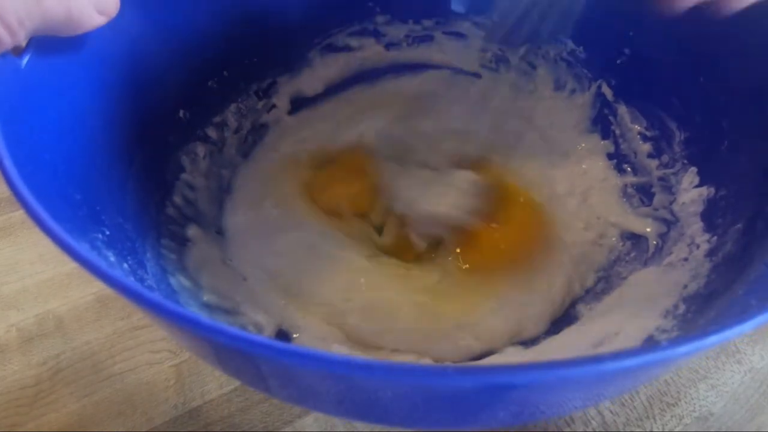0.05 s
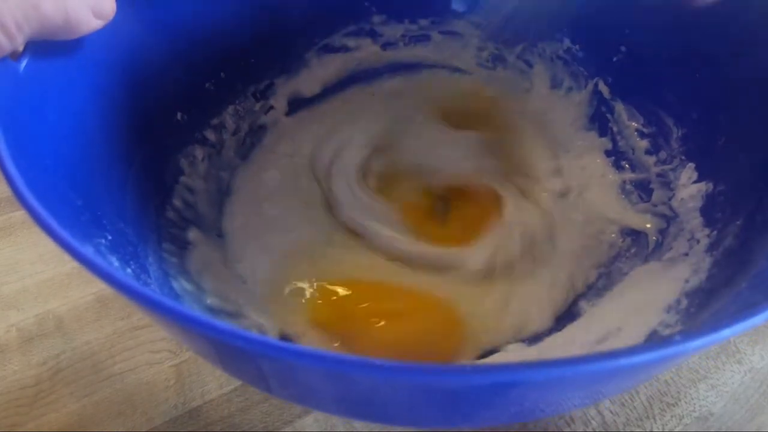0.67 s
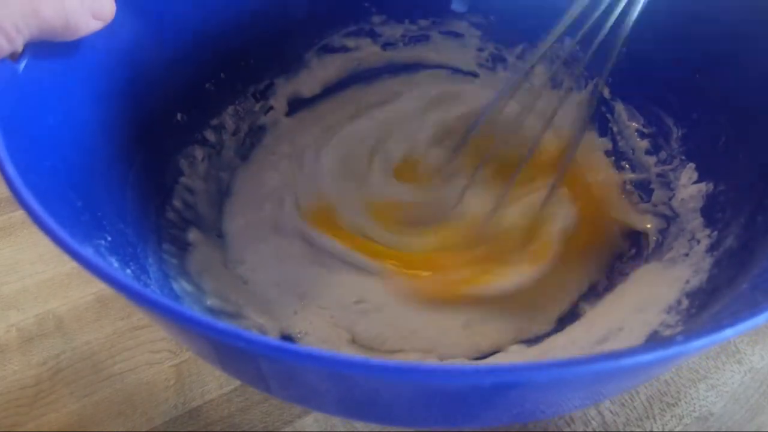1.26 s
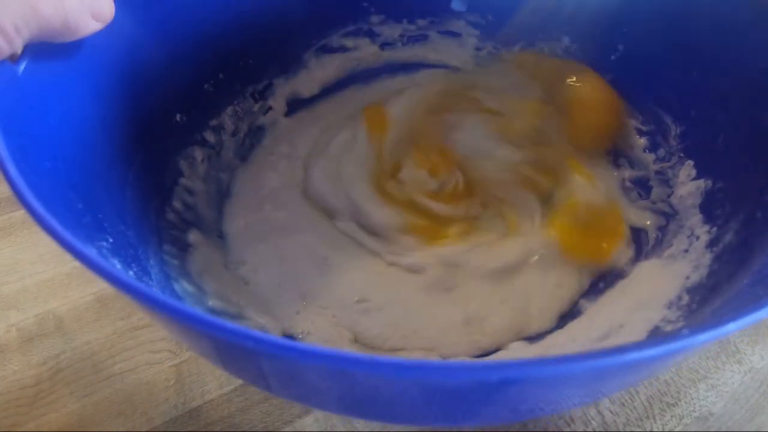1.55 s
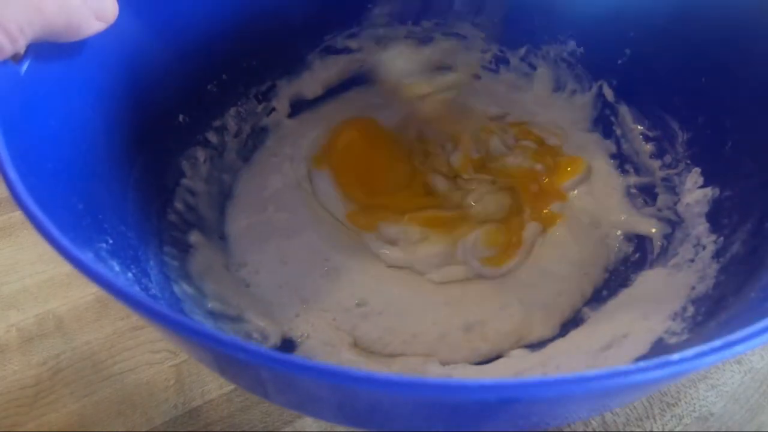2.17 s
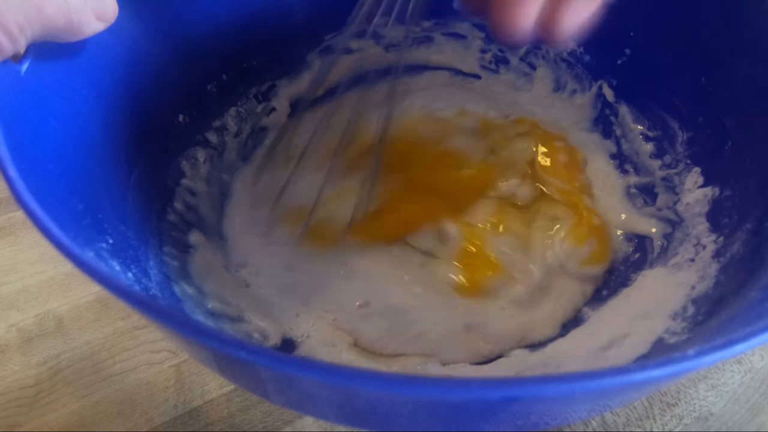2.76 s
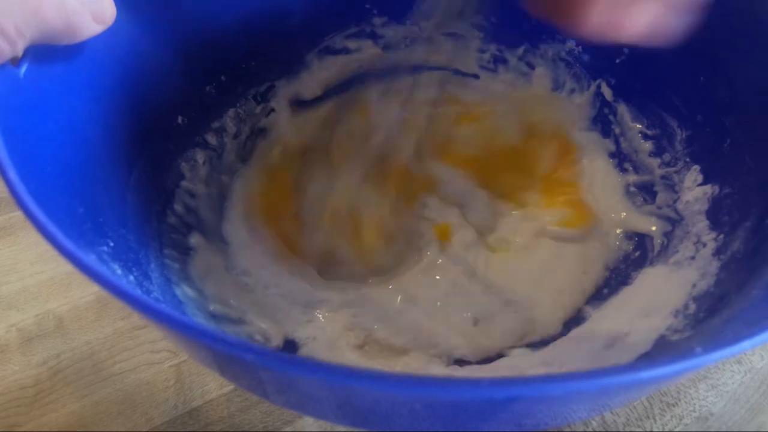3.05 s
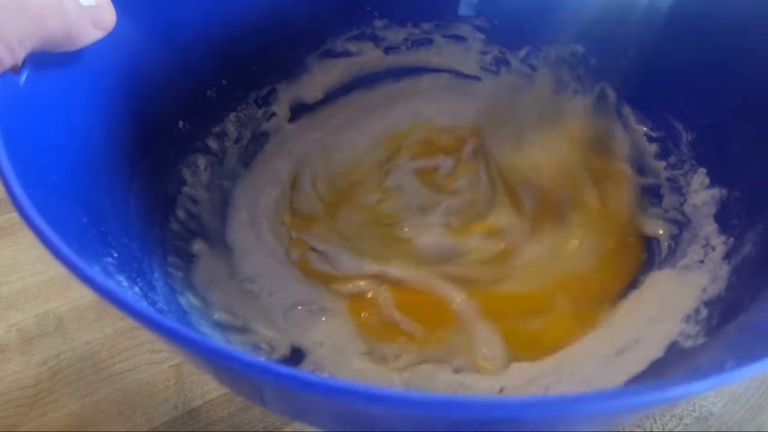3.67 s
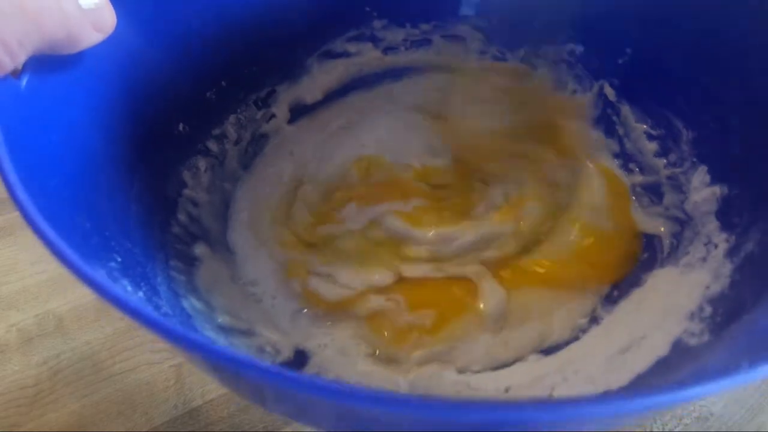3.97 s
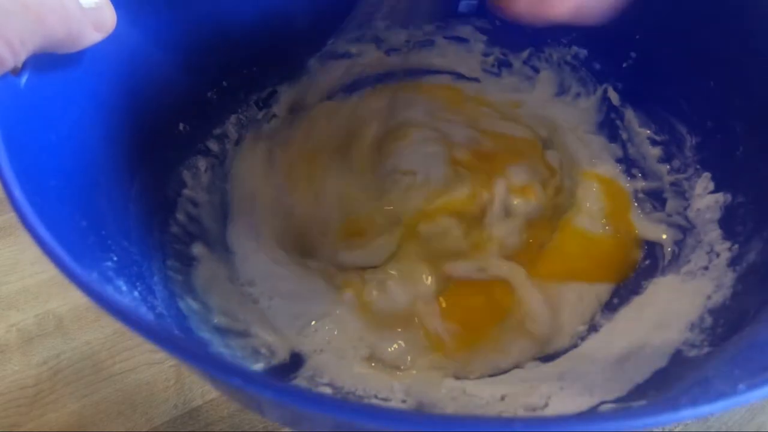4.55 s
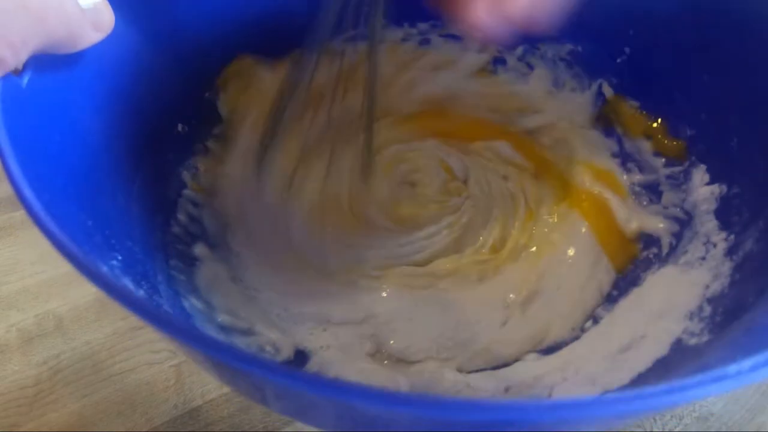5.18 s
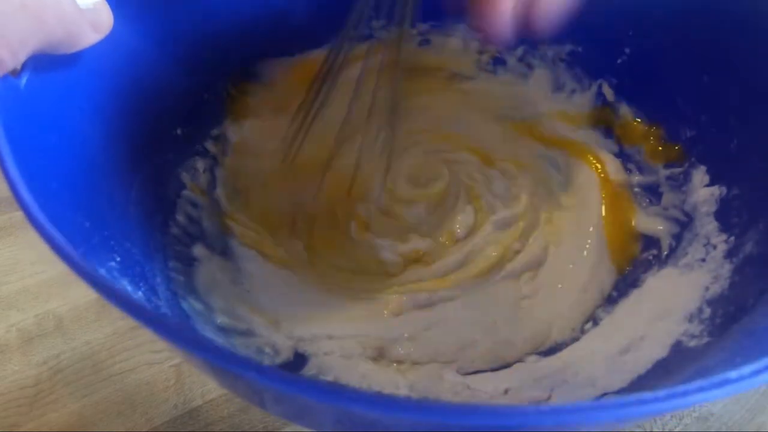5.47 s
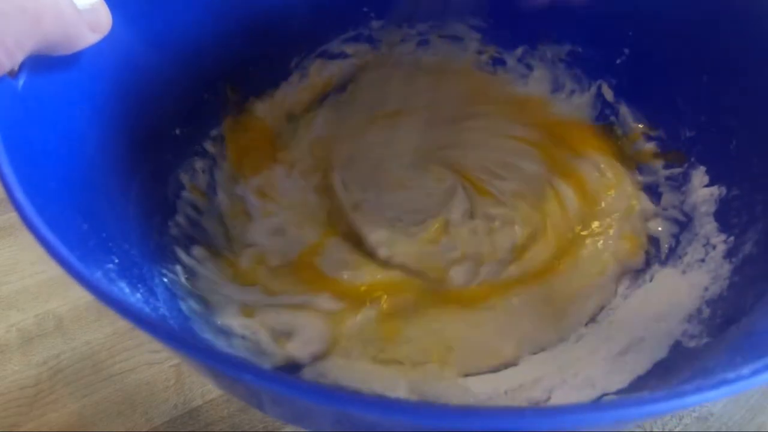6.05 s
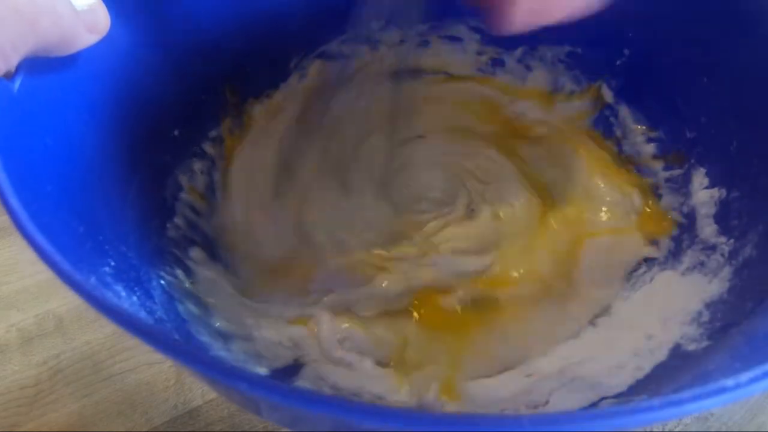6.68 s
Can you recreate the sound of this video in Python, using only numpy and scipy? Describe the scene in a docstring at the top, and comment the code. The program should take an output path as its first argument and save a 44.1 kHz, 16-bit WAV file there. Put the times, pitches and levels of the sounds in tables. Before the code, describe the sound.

A wire whisk beats eggs into batter in a plastic bowl, heard up close in a small, slightly reverberant kitchen. From the start, quick, uneven hollow knocks and thin wire ticks mix with rasping swipes along the bowl wall and fine wet crackles. Sharper clicks stand out around 0.4 and 0.7 seconds, and the bowl occasionally shifts on the counter with soft low thuds. At about 2 seconds the whisking rests, leaving only a faint low appliance hum that runs throughout. A short rub and a knock come around 2.5 seconds, and the beating resumes at 2.8 seconds, easing briefly just after 4 seconds. From about 4.9 seconds the strokes are fuller and wetter, with more squelches and tiny snaps of batter and a sharp clack near 6.3 seconds. The whisking continues until the end, just before 7 seconds.

```python
"""Quick knocks and wet swipes: a wire whisk beats eggs into batter in a plastic bowl on a kitchen
counter, with a short rest after two seconds. Impacts of the wires excite the bowl's normal modes, and
stick-slip friction on its wall drives a rasp and a drone. The batter crackles as its films rupture.
An appliance hums low in the small, reverberant room."""
import sys
import numpy as np
from scipy import signal
from scipy.fft import rfft, irfft, next_fast_len
from scipy.io import wavfile
from scipy.ndimage import uniform_filter1d

SR = 44100
rng = np.random.default_rng(int(sys.argv[2]) if len(sys.argv) > 2 else 0)


def wav_out(sig):
    """Save sig, one row per channel (or a flat mono array), as 16-bit PCM at SR to the path in sys.argv[1]."""
    wavfile.write(sys.argv[1], SR, np.round(np.clip(np.atleast_2d(sig).T, -1, 1) * 32767).astype(np.int16))


N = 300365
TIME = np.arange(N) / SR
CUTOFF_HZ = 16000


def from_db(db):
    """Amplitude ratio of a level in decibels."""
    return 10 ** (np.asarray(db) / 20)


def rms_one(x):
    """Normalisation to unit rms."""
    return x / np.sqrt(np.mean(x ** 2) + 1e-20)


def peak_one(x):
    """Normalisation to unit rms over the loudest 4 ms."""
    return x / np.sqrt(uniform_filter1d(x ** 2, size=176, mode="constant").max() + 1e-20)


def steady(x, size=2600):
    """Division by the running rms flattens the envelope and keeps the fine structure."""
    local_power = np.maximum(uniform_filter1d(x ** 2, size=size), 0)
    return x / np.sqrt(local_power + .02 * np.mean(x ** 2))


def drift(per_s):
    """Random modulation of unit rms, interpolated between Gaussian values."""
    return rms_one(np.interp(TIME * per_s, np.arange(4096), rng.standard_normal(4096)))


def lowpass(x, hz, order):
    """Butterworth low-pass filtering."""
    return signal.sosfilt(signal.butter(order, hz, fs=SR, output="sos"), x)


def colour(x, spectrum):
    """Minimum-phase filtering to rows of (f/Hz, level/dB), by way of the causal cepstrum."""
    size = next_fast_len(len(x) + 4096)
    size += size % 2
    hz, db = np.transpose(spectrum)
    bin_hz = np.arange(size // 2 + 1) * SR / size
    log_gain = np.log(from_db(np.interp(np.log(bin_hz + 1), np.log(hz), db)))
    cepstrum = irfft(log_gain)[:size // 2]
    response = np.exp(2 * rfft(cepstrum, size) - cepstrum[0])
    return irfft(rfft(x, size) * response)[:len(x)]


def resonate(x, hz, *widths_hz):
    """Damped resonators in series, one per bandwidth, each of unit gain at resonance."""
    for width in widths_hz:
        r = np.exp(-np.pi * width / SR)
        feedback = [1, -2 * r * np.cos(2 * np.pi * hz / SR), r * r]
        x = signal.lfilter(np.array([1, 0, -1]) * (1 - r * r) / 2, feedback, x + 1e-18)
    return x


def body(x, modes, scatter_db=0):
    """Modal superposition; the point of contact scatters the level of each mode."""
    return sum((-1) ** k * from_db(db + scatter_db * rng.standard_normal()) * resonate(x, hz, width)
               for k, (hz, width, db) in enumerate(modes))


def impulses(per_s, spread_db):
    """A Poisson process of clicks, mostly small, a few large."""
    sizes = from_db(spread_db * np.minimum(rng.exponential(1, N), 4)) * rng.choice([-1, 1], N)
    return sizes * (rng.random(N) < per_s / SR)


def grains(spectrum, per_s, q, spread_db, patchy_db, count=20):
    """Random impulses ring resonators of quality q; the favoured pitches shift as the batter moves."""
    hz, db = np.transpose(spectrum)
    clicks, band = impulses(per_s, spread_db), rng.integers(0, count, N)
    out = np.zeros(N)
    for k, pitch in enumerate(np.geomspace(hz[0], hz[-1], count)):
        ring = resonate(clicks * (band == k), pitch, pitch / q, 4 * pitch / q)
        out += from_db(np.interp(pitch, hz, db) + patchy_db * drift(25)) * ring
    return steady(out)


def swell(rows, attack_s, release_s):
    """Envelope of rows (t/s, duration/s, level/dB): exponential rise, hold and decay, added in power."""
    t = TIME[::40]
    power = np.zeros(len(t))
    for start, length, db in rows:
        nepers = np.maximum(start - t, 0) / attack_s + np.maximum(t - start - length, 0) / release_s
        power += from_db(2 * db) * np.exp(-2 * nepers)
    return np.interp(TIME, t, np.sqrt(power))


# spectrum of the room's air noise: f/Hz, relative level/dB
AIR_SPECTRUM = [(20, -1), (45, -2), (90, 2), (150, -6), (290, -2), (400, -14), (650, -25), (1000, -25),
                (1600, -33), (5000, -35), (16000, -44)]
# tones of the appliance: f/Hz, rms level/dB
HUM_TONES = [(57.66, -48.5), (64.86, -51.7), (79.28, -53.0), (115.0, -66)]
def appliance(air_db=-55):
    """Beating: close low tones throb against each other over a soft rush of air."""
    tones = sum(from_db(db) * np.sqrt(2) * np.sin(2 * np.pi * (hz * TIME + rng.random()))
                for hz, db in HUM_TONES)
    return tones + from_db(air_db) * rms_one(colour(rng.standard_normal(N), AIR_SPECTRUM))


# reverberation time by band: lower f/Hz, upper f/Hz, T60/s
ROOM_DECAY = [(40, 2800, 0.44), (2700, 10200, 0.31), (9000, 21000, 0.25)]
def kitchen(x, build_s=0.00039):
    """Reverberation: dense reflections from near walls decay exponentially, the treble soonest."""
    t = TIME[:SR // 2]
    tail = np.zeros(len(t))
    for low, high, t60 in ROOM_DECAY:
        band = signal.butter(2, [low, min(high, CUTOFF_HZ)], "band", fs=SR, output="sos")
        tail += signal.sosfilt(band, rng.standard_normal(len(t))) * from_db(-60 * t / t60)
    tail *= 1 - np.exp(-t / build_s)
    return signal.fftconvolve(x, tail / np.sqrt(np.sum(tail ** 2)))[:N]


# spells of whisking, with the wires always in the batter: t/s, duration/s, relative level/dB
SPELLS = [(0.104, 0.23, -8), (0.392, 0.93, 1.5), (1.256, 0.67, 2.5), (2.826, 0.59, -1.5),
          (3.382, 0.72, 2.5), (4.26, 0.21, -7), (4.442, 0.46, 2.5), (4.85, 1.95, 5.5)]
# swipes through the batter and along the wall, the first row a brief burst as the sound begins: t/s,
# duration/s, wall f/Hz, then relative level/dB of scrape, drone, crackle and squelch
SWIPES = [(0.0, 0.016, 536, -40.5, -75, -66.5, -83), (0.085, 0.11, 479, -42.5, -45.5, -71, -73),
          (0.195, 0.054, 462, -56, -68, -63, -64.5), (0.425, 0.0083, 495, -38, -60, -58, -70),
          (0.65, 0.023, 455, -43.5, -47, -57, -67), (0.88, 0.14, 481, -49.5, -69, -65.5, -93),
          (1.099, 0.024, 505, -41.5, -46.5, -58.5, -64), (1.304, 0.044, 449, -42.5, -45, -58, -59),
          (1.466, 0.067, 472, -40, -39.5, -66, -71), (1.553, 0.043, 460, -46, -57, -66, -64),
          (1.742, 0.12, 456, -44.5, -52, -68.5, -71), (1.9, 0.086, 498, -50.5, -54, -68.5, -79),
          (2.47, 0.05, 450, -58, -35.5, -90, -100), (2.555, 0.05, 437, -44, -40, -68, -92),
          (2.68, 0.05, 470, -53.5, -54.5, -72, -89), (2.817, 0.07, 461, -44.5, -46.5, -67, -67),
          (2.948, 0.023, 478, -64, -48.5, -67, -83), (3.066, 0.024, 487, -52, -62, -65, -87),
          (3.13, 0.096, 463, -45, -44.5, -65.5, -68), (3.432, 0.086, 477, -40.5, -44.5, -70.5, -64),
          (3.614, 0.058, 442, -41.5, -37.5, -73, -85), (3.713, 0.059, 464, -38.5, -53.5, -62, -57),
          (3.919, 0.091, 490, -41.5, -48, -61, -64), (4.05, 0.086, 482, -52, -45, -78, -91),
          (4.214, 0.052, 484, -54.5, -49.5, -71.5, -96), (4.3, 0.039, 483, -40.5, -43.5, -63, -86),
          (4.43, 0.11, 501, -44.5, -45, -66, -91), (4.601, 0.03, 471, -44, -38, -62.5, -64.5),
          (4.711, 0.021, 496, -38, -61, -65, -84), (4.788, 0.02, 472, -43, -35.5, -61, -82),
          (4.859, 0.063, 491, -45, -45.5, -67, -57.5), (4.966, 0.034, 462, -41, -43, -73, -66),
          (5.031, 0.041, 494, -39.5, -36.5, -66, -54), (5.163, 0.13, 482, -48, -47.5, -61, -62),
          (5.395, 0.051, 482, -41, -35.5, -70, -62), (5.523, 0.033, 502, -45, -38, -59, -62),
          (5.6, 0.015, 478, -31.5, -48, -82, -54.5), (5.661, 0.02, 482, -43.5, -33.5, -59, -57.5),
          (5.848, 0.063, 466, -66, -48, -76, -66.5), (5.955, 0.084, 477, -41.5, -50, -62, -59),
          (6.088, 0.079, 451, -52, -39.5, -64, -65.5), (6.297, 0.033, 478, -41.5, -59, -72, -57),
          (6.394, 0.042, 444, -59, -41.5, -62, -60), (6.547, 0.054, 478, -33.5, -44, -62, -55),
          (6.666, 0.063, 475, -43, -42.5, -56, -59.5)]
def effort(sound, stir_db, attack_s, release_s):
    """Incoherent addition: the envelope of one sound sums swipes and uneven stirring in power."""
    column = ["scrape", "drone", "crackle", "squelch"].index(sound)
    rows = [(start, length, levels[column]) for start, length, _, *levels in SWIPES]
    stirring = swell(SPELLS, attack_s=0.004, release_s=0.011) * from_db(stir_db + 2 * drift(7.6))
    return np.hypot(swell(rows, attack_s, release_s), stirring)


def wall_note(wander_hz=10):
    """Loading: the wall's natural frequency glides from swipe to swipe and wanders as batter shifts."""
    start, length, hz, *_ = np.transpose(SWIPES)
    return np.interp(TIME, start + length / 2, hz) + wander_hz * drift(9)


# pitch range of bursting films, then spectra of crackle and squelch: f/Hz, relative level/dB
FILM_RANGE = [(2000, 0), (15000, 0)]
CRACKLE_SPECTRUM = [(1500, -12.5), (2600, -19.5), (3700, -12), (5000, 1.5), (6000, 5.5), (7000, 7.5),
                    (8300, 2.5), (9400, -10), (12500, -24), (16000, -34)]
SQUELCH_SPECTRUM = [(900, 8.5), (2300, 16.5), (2750, 12), (3700, 9.5), (5200, 7.5), (8000, 2.5),
                    (10300, -4.5), (13000, -2), (14500, -25), (16000, -7)]
def batter(crackle_db=5.0, squelch_db=10.5, clump_db=3.5):
    """Film rupture: thin films burst in tiny clicks; a fast stroke rips the batter with a squelch."""
    bursting = effort("crackle", stir_db=-71.5, attack_s=0.015, release_s=0.043)
    ripping = effort("squelch", stir_db=-80, attack_s=0.016, release_s=0.017)
    bursts = grains(FILM_RANGE, per_s=3300, q=6.3, spread_db=3.0, patchy_db=2.5, count=13)
    rips = grains(FILM_RANGE, per_s=12000, q=6.3, spread_db=1.5, patchy_db=4.5, count=13)
    crackle = steady(colour(bursts, CRACKLE_SPECTRUM))
    squelch = steady(colour(rips * from_db(clump_db * drift(130)), SQUELCH_SPECTRUM))
    return from_db(crackle_db) * bursting * crackle + from_db(squelch_db) * ripping * squelch


# sharp pitched clicks: films snapping off the wires, and the brief ring of a struck wire or bowl: t/s,
# level/dB, f/Hz
SNAP_CLICKS = [(0.146, -52.5, 6430), (0.191, -55, 6300), (0.234, -49, 11800), (0.459, -46, 9900),
               (0.661, -43, 7250), (0.855, -51, 6700), (1.140, -52, 7500), (1.269, -47, 7340),
               (1.299, -49, 6840), (1.355, -54, 7400), (1.443, -54, 7170), (1.536, -50, 6740),
               (1.555, -52, 6300), (1.765, -56, 5500), (2.545, -37.5, 2300), (2.855, -46, 7340),
               (3.139, -56, 6500), (3.197, -46, 7100), (3.335, -50, 6800), (3.457, -56, 9000),
               (3.919, -58, 5970), (3.980, -56, 7000), (4.341, -56, 6000), (4.46, -57, 6900),
               (4.563, -55, 6300), (4.579, -44.5, 6740), (4.605, -54, 5900), (4.629, -51, 7100),
               (4.650, -52, 7950), (4.761, -51.5, 6100), (4.804, -47, 6550), (4.868, -46, 12300),
               (4.892, -48, 6100), (4.926, -48, 6300), (5.037, -40, 5500), (5.047, -39.5, 10700),
               (5.094, -46, 7600), (5.122, -50, 8500), (5.177, -46, 12500), (5.189, -43, 8500),
               (5.215, -40, 6400), (5.390, -46, 6800), (5.427, -40, 5100), (5.439, -61, 6300),
               (5.509, -42, 6400), (5.515, -39, 4300), (5.599, -41, 5640), (5.676, -41, 9600),
               (5.832, -62, 5670), (5.859, -50, 6400), (6.011, -45.5, 10500), (6.033, -46, 6100),
               (6.061, -45.5, 6850), (6.115, -50, 10100), (6.153, -48, 6100), (6.200, -59, 6450),
               (6.252, -57, 6500), (6.277, -55, 5710), (6.292, -48, 5100), (6.342, -34, 9800),
               (6.449, -53, 11000), (6.519, -47, 6600), (6.654, -53, 10500)]
def snaps(tear_s=0.0007, q=4.5):
    """Transient excitation: a stretched film tears, or a struck wire rings briefly, within a millisecond,
    giving a pitched click."""
    t = TIME[:1024]
    out = np.zeros(N + len(t))
    for onset, level_db, hz in SNAP_CLICKS:
        tear = rng.standard_normal(len(t)) * np.exp(-t / tear_s)
        at = round((onset - tear_s) * SR)
        out[at:at + len(t)] += from_db(level_db) * peak_one(resonate(tear, hz, hz / q, 2 * hz / q))
    return out[:N]


# lurches of the bowl: t/s, duration/s, relative level/dB
BOWL_LURCHES = [(0.15, 0.11, -50), (0.44, 0.055, -40), (0.68, 0.036, -42.5), (0.89, 0.043, -59),
                (1.085, 0.02, -43.5), (1.28, 0.046, -45.5), (2.455, .06, -41), (3.61, 0.092, -48.5),
                (3.95, 0.027, -49), (5.57, 0.1, -50), (6.55, 0.029, -53)]
# spectrum of the rocking bowl: f/Hz, relative level/dB
ROCKING_SPECTRUM = [(60, -44.5), (100, 6.5), (125, -2.5), (165, 2), (190, -13), (218, -0.5), (245, -3.5),
                    (280, -4.5), (380, -12.5), (600, -25.5), (3000, -53)]
def rocking(friction, stir_db=-60):
    """Forced vibration: the dragging wires shift the bowl on the counter with low thuds."""
    lurching = swell(BOWL_LURCHES, attack_s=0.0051, release_s=0.012)
    stirring = from_db(stir_db) * swell(SPELLS, attack_s=0.018, release_s=0.026)
    return (lurching + stirring) * steady(colour(friction, ROCKING_SPECTRUM))


def wall_ring(friction, note_hz, width_hz=30, skirt_hz=170):
    """Resonance: friction drives a narrow mode whose centre follows the wall's note."""
    carrier = np.exp(2j * np.pi * np.cumsum(note_hz) / SR)
    baseband = friction / carrier + 1e-18
    for r in np.exp(-np.pi * np.array([width_hz, skirt_hz]) / SR):
        baseband = signal.lfilter([1 - r], [1, -r], baseband)
    return np.real(baseband * carrier)


# modes of the rubbed bowl: f/Hz, bandwidth/Hz, relative level/dB
RUBBED_MODES = [(660, 130, -0.5), (1024, 75, 7.5), (1150, 265, 4), (1480, 250, -1), (1835, 280, -5),
                (2170, 120, 1), (2430, 110, -2)]
# spectrum of popping air pockets: f/Hz, relative level/dB
POP_SPECTRUM = [(620, 7.5), (820, -32), (1080, 6), (1350, -9), (1750, -9), (2250, -1), (2500, -32),
                (2900, -14)]
def dragging(note_hz, rasp_db=-6.5, pops_db=-10, drone_db=-3.5, muffle_hz=2900):
    """Stick-slip friction: the wires drive the bowl in tiny slips and open air pockets behind them."""
    scraping = effort("scrape", stir_db=-52.0, attack_s=0.02, release_s=0.019)
    droning = effort("drone", stir_db=-54.5, attack_s=0.012, release_s=0.033)
    slips = impulses(per_s=900, spread_db=2.0) * from_db(3.2 * drift(70))  # clumps as each wire passes
    friction = lowpass(slips, muffle_hz, order=4)  # batter softens each slip
    rasp = from_db(rasp_db) * steady(body(friction, RUBBED_MODES))
    pops = from_db(pops_db) * grains(POP_SPECTRUM, per_s=200, q=14.7, spread_db=4.0, patchy_db=4.5)
    drone = from_db(drone_db) * steady(wall_ring(friction, note_hz), size=800)
    return scraping * (rasp + pops) + droning * drone + rocking(friction)


# spectrum of a wire's tick: f/Hz, relative level/dB
TICK_SPECTRUM = [(1500, -11), (3000, -17), (4300, -18), (5800, -3.5), (8000, -9), (9200, -13),
                 (10500, -15.5), (12800, -13.5), (16000, -18)]
def wire_tick(t, top_hz, sweep_s=0.0007, grit_db=-9, grit_s=0.0051):
    """Dispersion: the highs of a click arrive first along the wire; a coat of batter damps the top."""
    sweep_hz = CUTOFF_HZ * (1 - t / sweep_s)
    chirp = np.sin(2 * np.pi * np.cumsum(sweep_hz) / SR) * (t < sweep_s)
    grit = from_db(grit_db) * rng.standard_normal(len(t)) * np.exp(-t / grit_s)
    return peak_one(lowpass(colour(chirp + grit, TICK_SPECTRUM), top_hz, order=4))


# modes of the struck bowl: f/Hz, bandwidth/Hz, relative level/dB
STRUCK_MODES = [(493, 81, 1.5), (611, 116, 3.5), (780.6, 240, -6), (1035, 93, 0.5), (1150, 67, 1),
                (1400, 190, -1), (1720, 490, -2), (2086, 1000, -0.5), (2370, 860, -1)]
def bowl_clack(t, push, cushion_db, skid_s=0.0077):
    """Free vibration: the bowl's modes ring after a wire lands and skids on."""
    skid_db = -23 + 0.37 * np.clip(cushion_db - 9, 0, 15)  # a cushioned wire sinks in more gradually
    skid = from_db(skid_db) * rng.standard_normal(len(t)) * np.exp(-t / skid_s)
    force = signal.fftconvolve(push, (t == 0) + skid)[:len(t)]
    return peak_one(body(force, STRUCK_MODES, scatter_db=3))


# wires striking the bowl: t/s, knock relative level/dB, plop f/Hz,
# wall boom relative level/dB, tick level/dB, tick cutoff f/Hz
IMPACTS = [(0.007, -41, 1405, -61.5, -67, 8000), (0.113, -19.5, 1110, -63, -65, 6900),
           (0.199, -29.5, 1090, -49, -46, 8000), (0.227, -54, 1100, -59, -45.5, 9100),
           (0.281, -26.5, 1050, -31.5, -53, 9000), (0.358, -35, 1690, -72, -50, 6850),
           (0.405, -39, 1200, -40.5, -45, 11700), (0.442, -21, 706, -27.5, -35, 15100),
           (0.4665, -22, 970, -55, -34.5, 14100), (0.57, -51, 1030, -45, -42, 13800),
           (0.639, -45, 1150, -51, -42, 9500), (0.667, -18.5, 1205, -30, -23.5, 14200),
           (0.6903, -18, 927, -59, -26.5, 13900), (0.88, -42, 1300, -44, -52, 8500),
           (0.942, -38, 920, -44, -45.5, 9200), (0.98, -34.5, 1070, -55, -59, 8500),
           (1.025, -35, 2340, -63, -68, 8000), (1.086, -32, 584, -48, -58, 8000),
           (1.2555, -20.5, 1015, -32, -52, 7000), (1.268, -21, 1010, -53, -54, 7000),
           (1.291, -19, 1015, -31, -45.5, 8500), (1.323, -29, 1110, -46, -52, 8000),
           (1.437, -34, 996, -52, -60, 8000), (1.464, -18.5, 1025, -45, -46.5, 8000),
           (1.518, -34, 1110, -50, -57, 8000), (1.585, -27.5, 1515, -49, -46.5, 11930),
           (1.63, -36, 1400, -48, -47.5, 12000), (1.698, -31.5, 1110, -65, -56, 8000),
           (1.727, -29, 696, -33.5, -46.5, 7880), (1.769, -27.5, 1110, -62, -38.5, 9150),
           (1.783, -34, 1550, -62, -52, 13000), (2.456, -39.5, 1220, -33.5, -65, 4050),
           (2.543, -23.5, 1045, -22, -42.5, 6750), (2.8036, -32.5, 790, -34, -46, 9000),
           (2.985, -42, 1080, -35, -74, 7000), (3.028, -47, 1330, -36, -73, 7000),
           (3.06, -41, 1380, -65, -52, 9000), (3.132, -36, 1480, -60, -51, 8500),
           (3.372, -43, 1480, -54, -48, 8500), (3.418, -30, 640, -36, -64, 8100),
           (3.45, -32, 2370, -54, -55, 8750), (3.484, -30.5, 630, -42, -74, 8000),
           (3.503, -25, 1150, -52, -62, 7000), (3.544, -35.5, 1480, -52, -60, 8000),
           (3.606, -21.5, 1030, -35, -50, 8000), (3.686, -29, 1150, -41, -52, 7840),
           (3.704, -32, 680, -45, -40.5, 9000), (3.735, -29, 680, -57, -49, 9000),
           (3.741, -27.5, 2310, -58, -39, 12200), (3.876, -29, 1050, -57, -53, 7000),
           (3.931, -23.5, 725, -33.5, -40, 7850), (3.949, -33, 1190, -60, -42, 8500),
           (4.143, -36, 1000, -59, -64, 8000), (4.161, -31, 1040, -56, -54, 14000),
           (4.307, -47, 1930, -60, -70, 8000), (4.337, -34.5, 2180, -41, -64, 8000),
           (4.426, -28.5, 1150, -57, -55, 7900), (4.445, -23, 1250, -33, -56.5, 8000),
           (4.532, -38, 1060, -45, -69, 8000), (4.57, -28.5, 1136, -66, -45, 9000),
           (4.604, -37, 2350, -50, -66, 12000), (4.612, -45, 1220, -29.5, -57, 8000),
           (4.687, -31, 555, -54, -71, 8000), (4.7, -32, 1200, -35, -59, 8000),
           (4.714, -34, 1150, -27, -57, 8000), (4.793, -37, 960, -27.5, -46, 15000),
           (4.857, -25, 1070, -40, -39.5, 9000), (4.976, -35, 1120, -44, -65, 8000),
           (4.997, -27.5, 1090, -46, -50, 7000), (5.035, -29.5, 1570, -50, -37.5, 8560),
           (5.055, -30, 740, -31.5, -50, 9000), (5.061, -31, 2400, -36, -49, 9000),
           (5.2, -40, 1090, -37.5, -54, 9000), (5.337, -27, 2320, -32, -47, 7000),
           (5.398, -35.5, 2430, -43, -47, 8000), (5.424, -51, 555, -44, -67, 8000),
           (5.446, -34, 2210, -45, -60, 8000), (5.493, -27, 1083, -34, -53, 8000),
           (5.521, -32.5, 2220, -27.5, -44, 9000), (5.592, -28, 1057, -25.5, -34.5, 11200),
           (5.659, -40, 1150, -29.5, -65, 8000), (5.816, -31, 1590, -48, -35, 8400),
           (5.949, -33, 1170, -33.5, -61, 8200), (5.962, -30, 2370, -49, -43, 15000),
           (6.104, -38, 2130, -49, -57, 10000), (6.237, -40, 1120, -44, -64, 8000),
           (6.264, -35, 1136, -31.5, -70, 8000), (6.291, -33, 2110, -50, -57, 9000),
           (6.318, -34, 1280, -53, -42, 8500), (6.339, -16.5, 670, -24, -33, 15000),
           (6.425, -37, 1150, -33, -40.5, 12000), (6.486, -31.5, 2170, -56, -56, 8000),
           (6.55, -32, 1140, -32, -35, 13900), (6.683, -43.5, 2190, -36, -37.5, 11300)]
def knocks(note_hz, knock_gain_db=-6.0, boom_gain_db=-4.0, plop_db=0.5, lag_s=0.000991,
           plop_width_hz=75, boom_width_hz=26, skirt_hz=450):
    """Impact: soft contact narrows the force spectrum, so a bare wire ticks and a coated one plops."""
    t = TIME[:8192]
    impulse = 1.0 * (t == 0)
    out = np.zeros(N + 2 * len(t))
    for onset, knock_db, plop_hz, boom_db, tick_db, top_hz in IMPACTS:
        wall_hz = np.interp(onset, TIME, note_hz) + 10 * rng.standard_normal()  # varies with the spot
        cushion_db = knock_db - tick_db  # the more batter on the wire, the weaker its tick
        hardness_hz = np.clip(6000 * from_db(-0.51 * cushion_db), 700, 9000)
        push = lowpass(impulse, hardness_hz, order=2)
        clack = bowl_clack(t, push, cushion_db) * np.sqrt(hardness_hz / 2000)
        plop = from_db(plop_db) * peak_one(resonate(push, plop_hz, plop_width_hz, skirt_hz))
        knock = from_db(knock_db + knock_gain_db) * peak_one(clack + plop)
        wall = peak_one(resonate(push, wall_hz, boom_width_hz, skirt_hz))
        boom = from_db(boom_db + boom_gain_db) * wall
        tick = from_db(tick_db) * wire_tick(t, top_hz)
        at = round((onset + lag_s) * SR)
        out[at:at + len(t)] += knock + boom + tick
    return out[:N]


def scene(knock_room_db=-9.0, drag_room_db=-11.5, batter_room_db=-7.0):
    """Superposition: direct sound of whisk, bowl and batter, their reverberation and the hum."""
    background = appliance()
    note_hz = wall_note()
    drag = dragging(note_hz)
    wet = batter() + snaps()
    hits = knocks(note_hz)
    sent = from_db(knock_room_db) * hits + from_db(drag_room_db) * drag + from_db(batter_room_db) * wet
    return (background + kitchen(sent) + wet + drag + hits)[None]


def record(dry, fade_from_s=6.73, fade_db_per_s=130):
    """Band limiting: a steep low-pass cuts the top; the sound fades exponentially at the very end."""
    fade = from_db(-fade_db_per_s * np.maximum(TIME - fade_from_s, 0))
    return signal.sosfilt(signal.ellip(10, .1, 80, CUTOFF_HZ, fs=SR, output="sos"), dry * fade)


dry = scene()
out = record(dry)
wav_out(out)
```